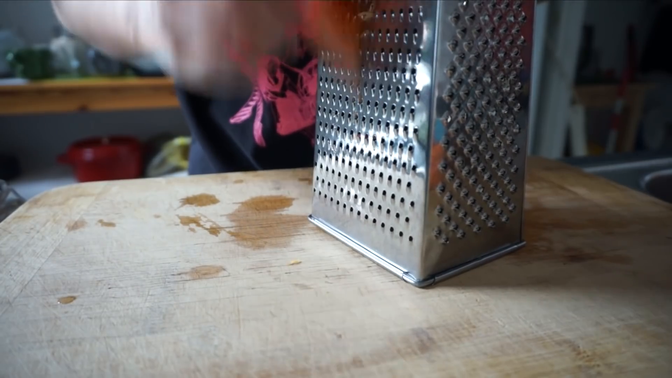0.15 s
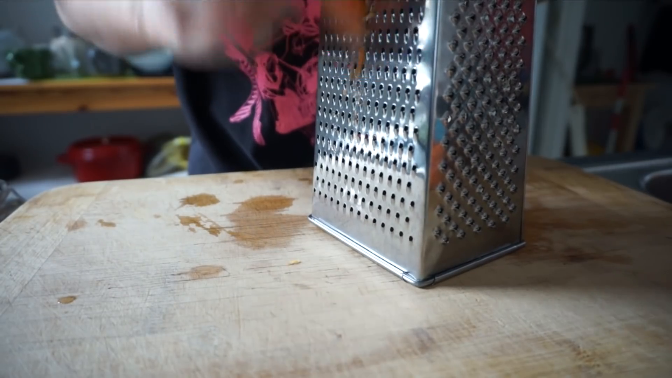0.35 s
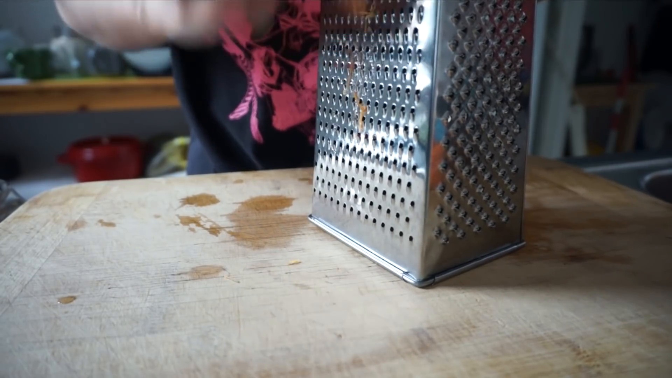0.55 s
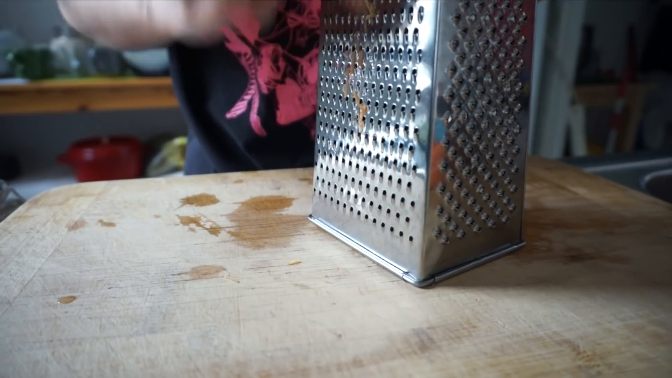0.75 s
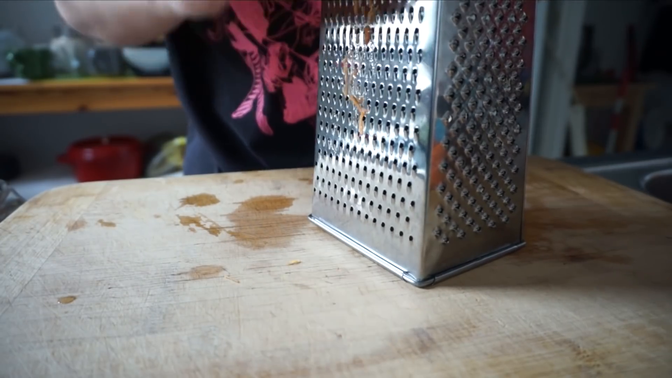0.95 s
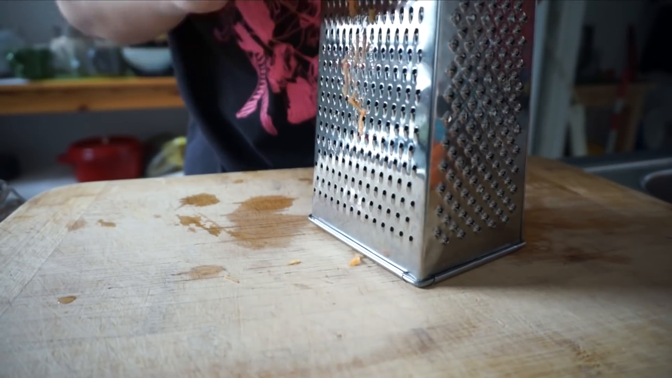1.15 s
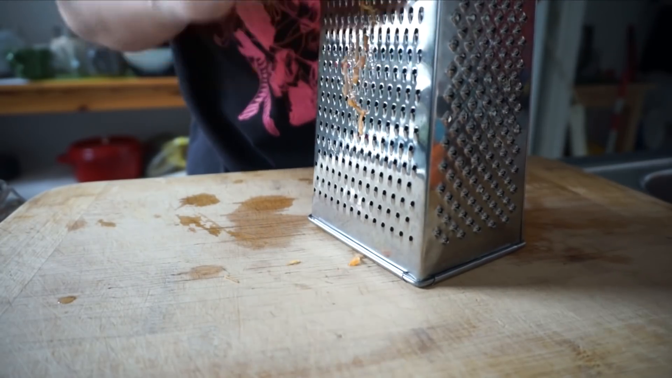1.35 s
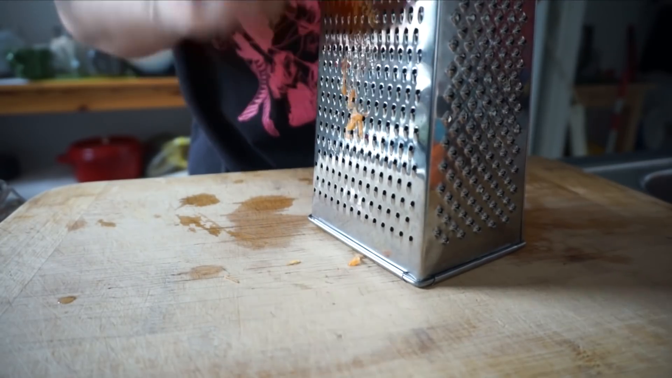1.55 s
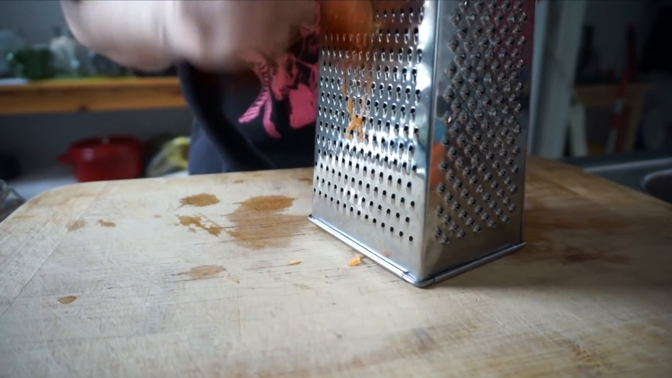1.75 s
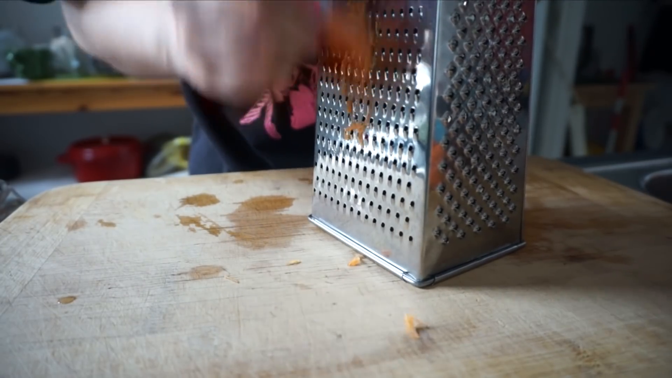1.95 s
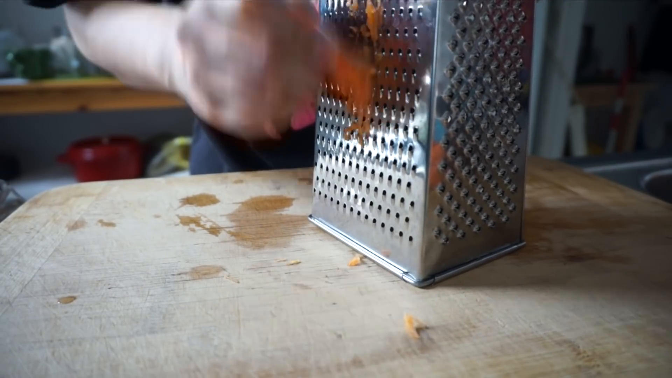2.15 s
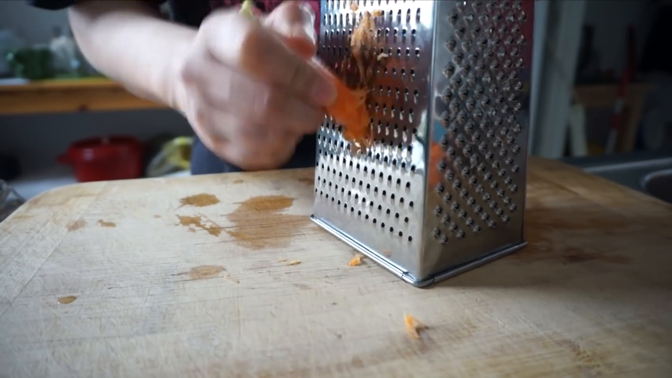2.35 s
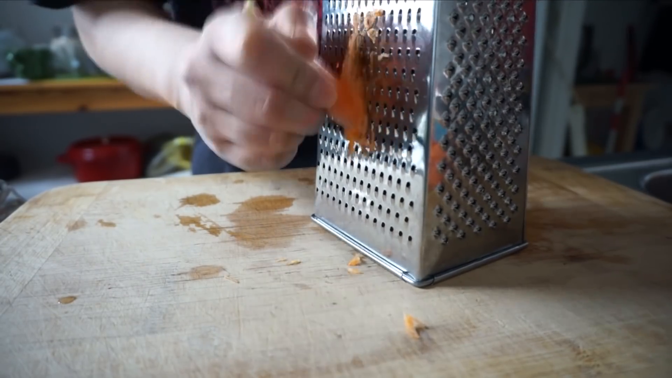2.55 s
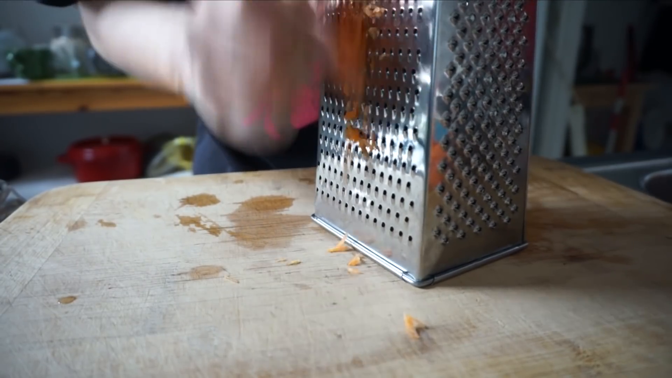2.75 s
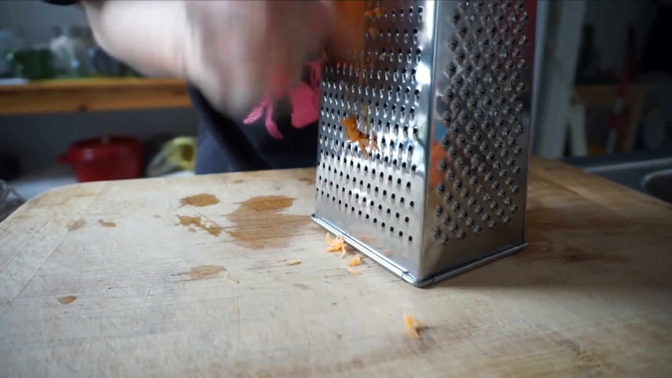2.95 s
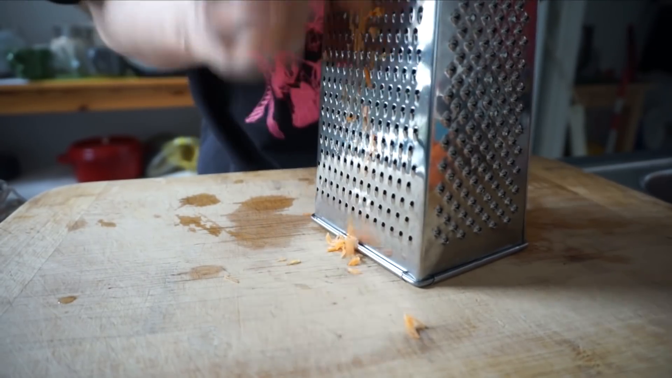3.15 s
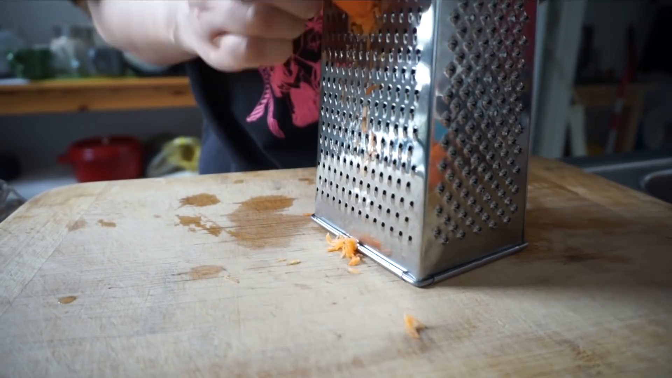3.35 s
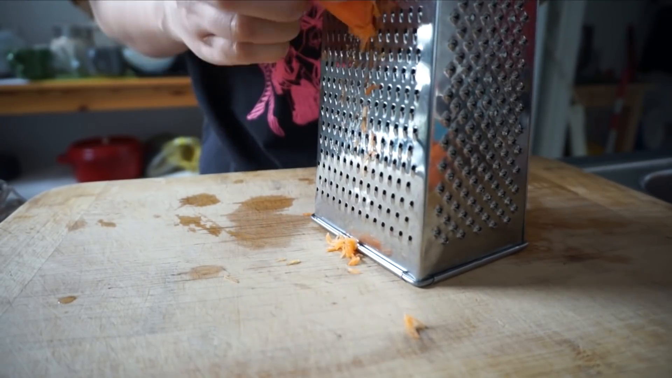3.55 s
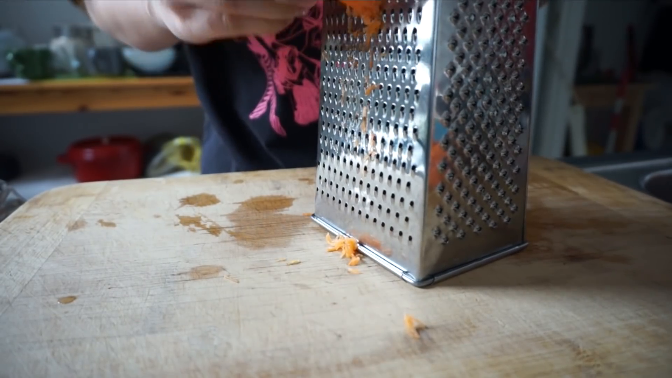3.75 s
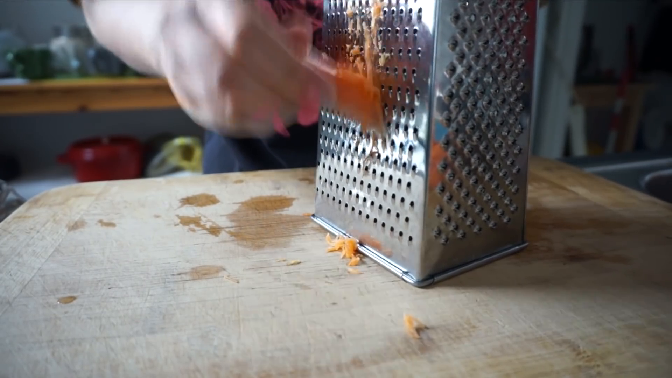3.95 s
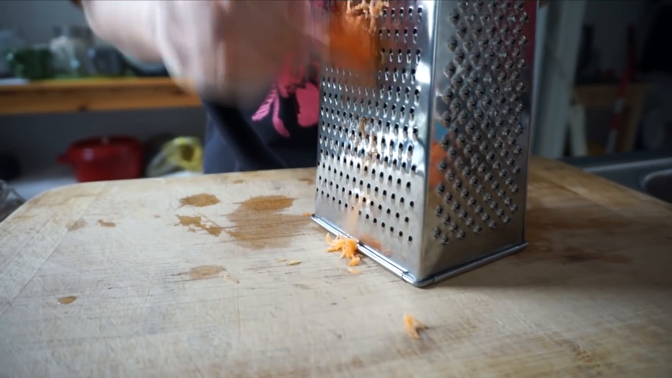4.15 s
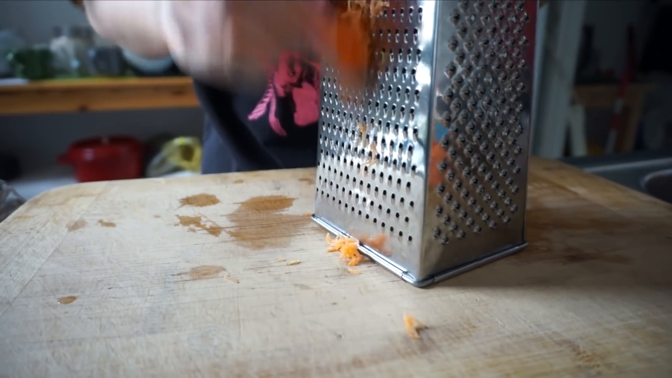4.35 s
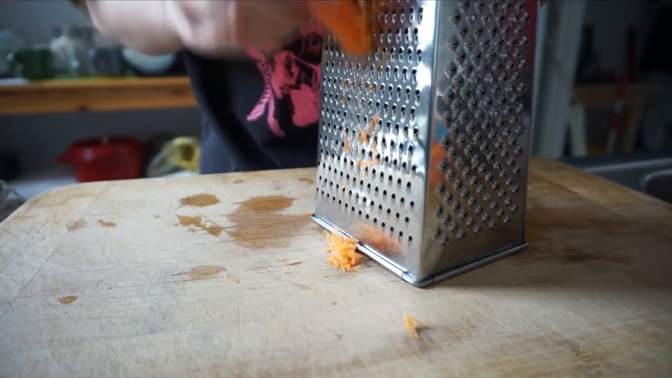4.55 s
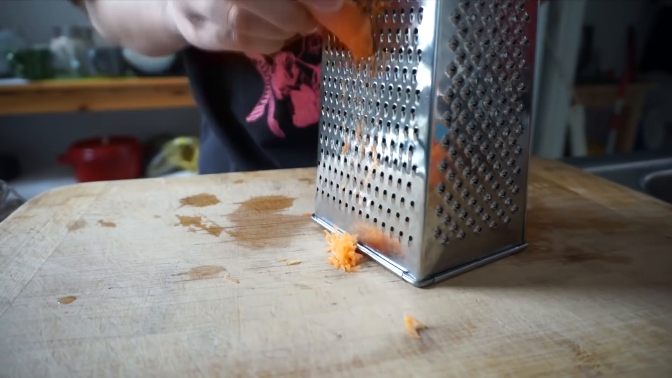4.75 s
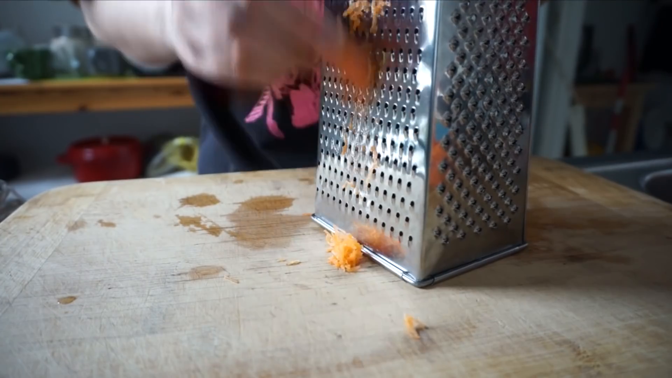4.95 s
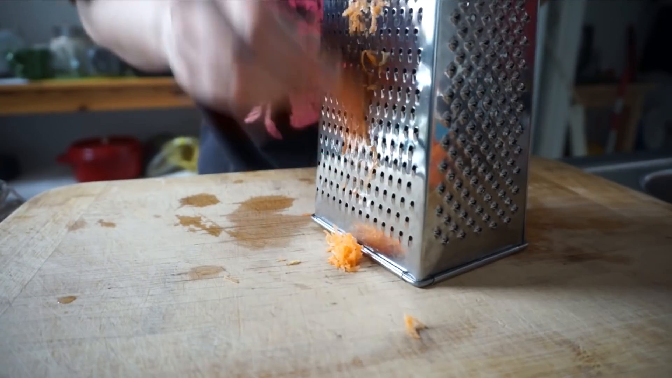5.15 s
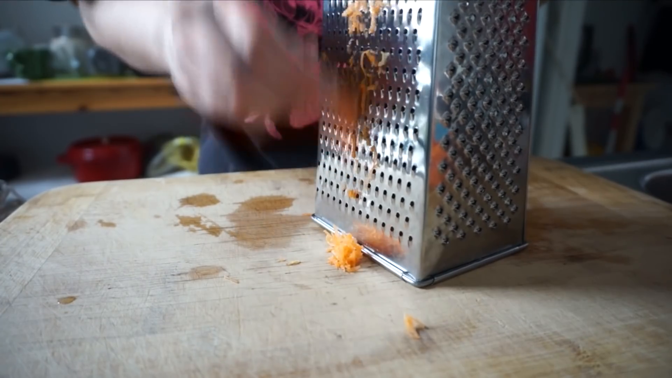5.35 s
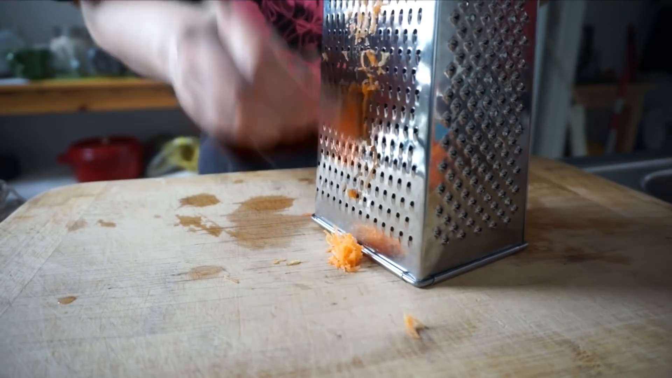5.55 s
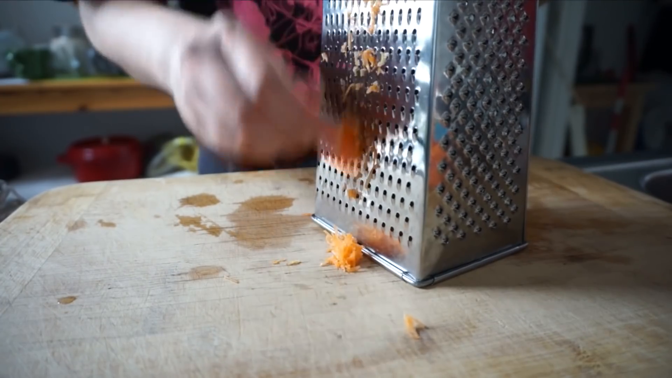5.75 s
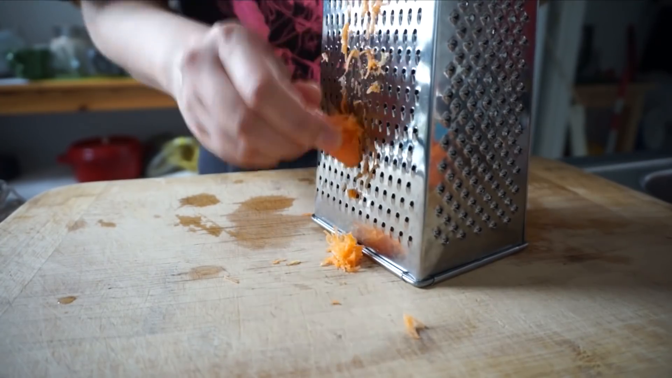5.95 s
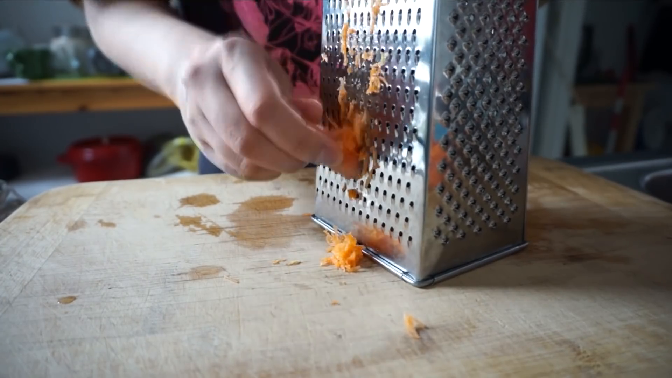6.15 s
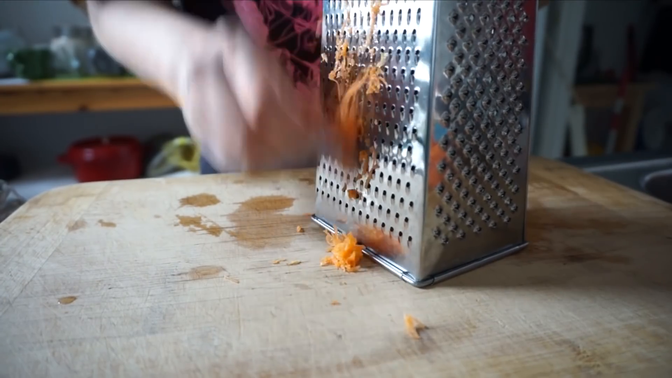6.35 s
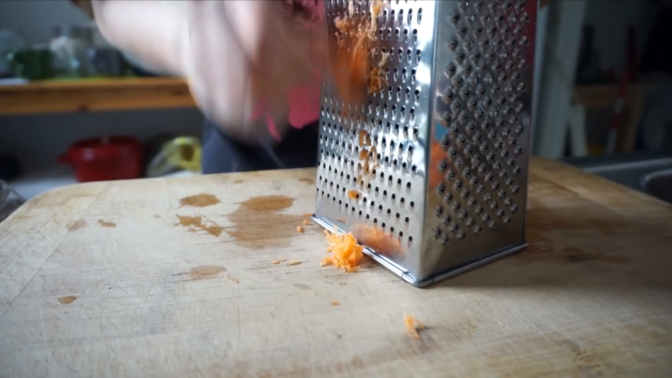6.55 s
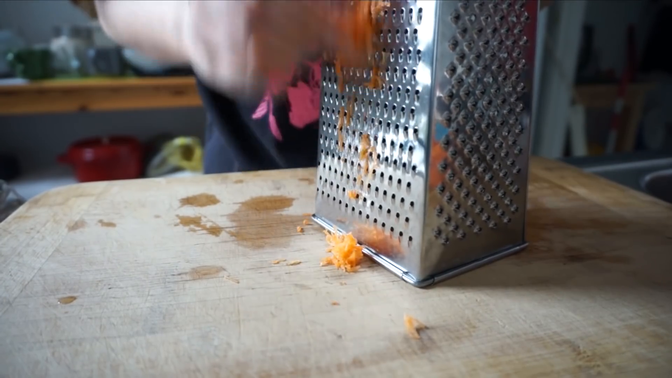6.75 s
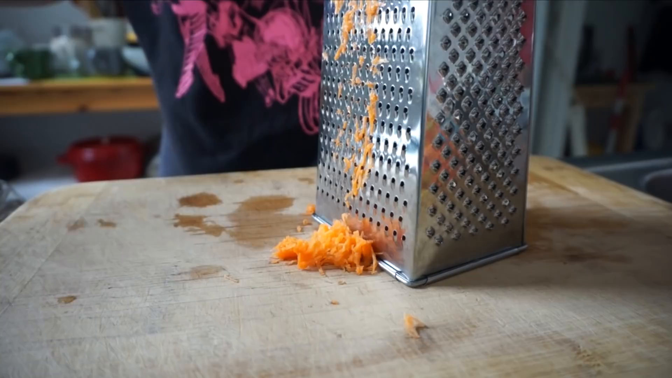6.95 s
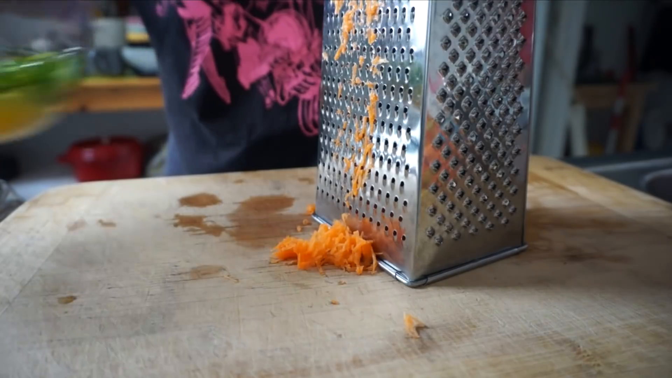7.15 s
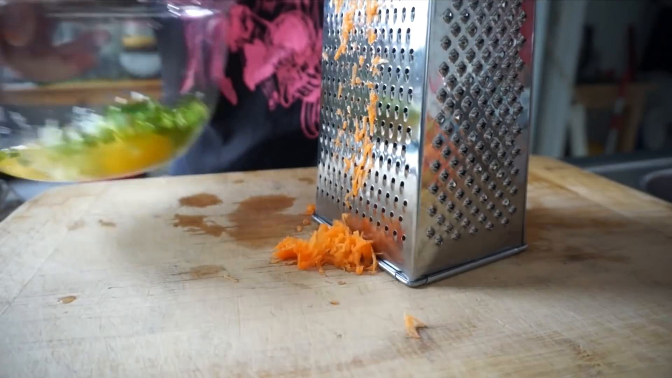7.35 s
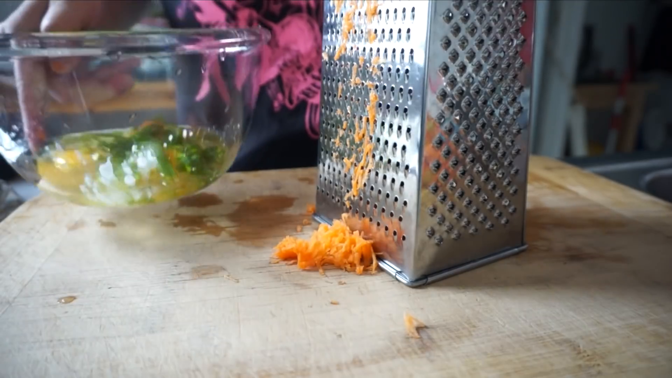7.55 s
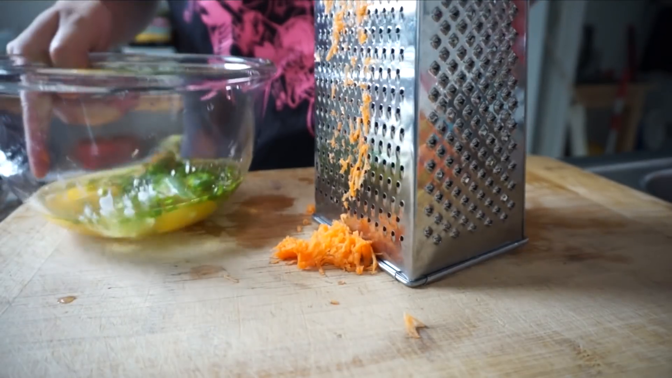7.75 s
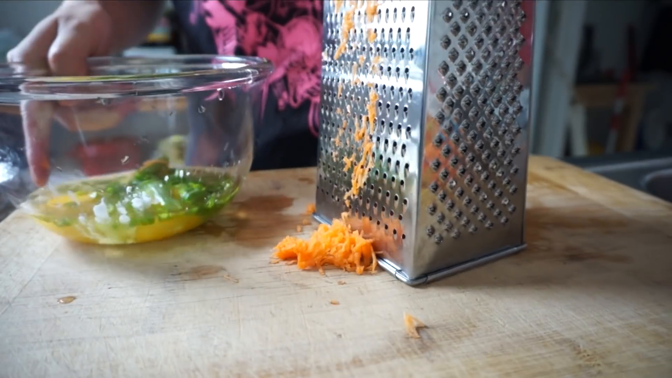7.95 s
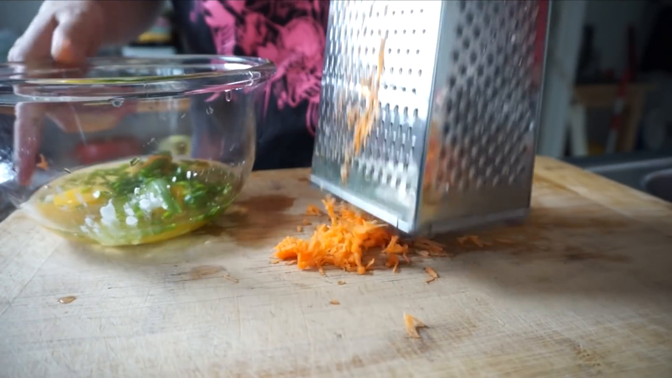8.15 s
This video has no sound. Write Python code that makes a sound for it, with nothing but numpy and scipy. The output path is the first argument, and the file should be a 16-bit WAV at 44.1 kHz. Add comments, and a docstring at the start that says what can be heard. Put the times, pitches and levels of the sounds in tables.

```python
"""A carrot is rubbed quickly up and down a steel box grater standing on a wooden board in a kitchen.
Dense random clicks, louder as the hand moves faster, make the tearing rasp and ring sheet-metal walls and box.
After a jump in time come faint hollow ticks, then a glass bowl is set down and rocks to rest: each touch
rings glass and board and throws a noisy clatter. Shaped noise gives the room's hum and hiss throughout.
A small close stereo microphone with a limiter picks it all up."""
import sys
import numpy as np
from scipy import signal
from scipy.fft import rfft, irfft, next_fast_len
from scipy.io import wavfile
from scipy.ndimage import uniform_filter1d

SR = 44100
rng = np.random.default_rng(int(sys.argv[2]) if len(sys.argv) > 2 else 0)


def ratio_of_db(decibels):
    """Turn decibels (scalar or array-like) into linear amplitude factors; 0 dB maps to 1."""
    return 10 ** (np.asarray(decibels, float) / 20)


def to_wav(s):
    """Save 16-bit WAV."""
    ch = np.atleast_2d(s).T  # columns
    pcm = np.round(np.clip(ch, -1, 1) * 32767)  # PCM
    wavfile.write(sys.argv[1], SR, pcm.astype(np.int16))


N = 362080   # length in samples


def rms_one(x):
    """Scale to unit rms."""
    return x / np.sqrt(np.mean(x ** 2) + 1e-20)


def shaped(x, points):
    """Filter by a smooth spectrum, joined on a log frequency axis through (pitch_hz, level_db) points."""
    size = next_fast_len(N)
    hz, db = np.transpose(points)
    bin_hz = np.arange(size // 2 + 1) * SR / size
    gain = ratio_of_db(np.interp(np.log(bin_hz + 1), np.log(hz), db))
    return irfft(rfft(x, size) * gain, size)[..., :N]


def coloured(x, points):
    """Filter by a smooth spectrum, then scale to unit rms."""
    return rms_one(shaped(x, points))


def drift(rate_hz):
    """Slow chance: noise through two equal one-pole low-passes with corners at rate_hz; spread 1."""
    hop = 40   # samples between drawn values
    r = np.exp(-2 * np.pi * rate_hz * hop / SR)
    noise = rng.standard_normal(N // hop + 2002)
    slow = signal.lfilter([1], [1, -2 * r, r * r], noise)[2000:]   # skip the filter's settling
    return np.interp(np.arange(N) / hop, np.arange(len(slow)), rms_one(slow))


def ring(push, hz, t60_s):
    """A decaying resonance: a unit click sets a sine of height 1 ringing."""
    r, w = ratio_of_db(-60 / (t60_s * SR)), 2 * np.pi * hz / SR
    return signal.lfilter([0, np.sin(w)], [1, -2 * r * np.cos(w), r * r], push + 1e-18)


def resonate(force, modes, wander_db, wander_hz):
    """The contact point moves, so each mode is driven now strongly, now weakly; the sharpest ring steadiest."""
    out = 0
    for hz, width_hz, db in modes:
        wander = np.minimum(drift(wander_hz) + 0.62 * drift(1.5), 1.5)
        drive = force * ratio_of_db(wander_db * min(width_hz / 50, 1) * wander)
        r = np.exp(-np.pi * width_hz / SR)
        feedback = [1, -2 * r * np.cos(2 * np.pi * hz / SR), r * r]
        mode = signal.lfilter([(1 - r * r) / 2, 0, (r * r - 1) / 2], feedback, drive)
        out = out + ratio_of_db(db) * mode
    return out


def hand():
    """Relative rasp and boom levels in dB: the hand swings like a pendulum; a light brush fills the turns."""
    # strokes, firm down and light up in turn, each until the next turn of the hand:
    # start_s [s], midway_rasp_db [dB], swell_db from start to end [dB], boom_db against the rasp [dB]
    strokes = [(-0.03, -8.5, -1, -15), (0.073, -10, -5, -20.4), (0.178, -6.5, -1, -17.5),
               (0.278, -12, -1, -21), (0.382, -9.5, -4.5, -17.5), (0.501, -12.0, 12, -22),
               (0.599, -9, 0, -14), (0.703, -11, 5.5, -24), (0.809, -7, 2, -16.8), (0.917, -12.5, 1, -17.1),
               (1.026, -7, -3, -17), (1.135, -10.5, 3, -22), (1.236, -8, -3, -18.5),
               (1.348, -10.5, 11, -20), (1.451, -7.5, -2.5, -15.0), (1.561, -10, -6, -21),
               (1.672, -9, -7, -16.5), (1.785, -11.5, 9, -20), (1.886, -8, 0, -16.5),
               (1.996, -10.5, 10, -18), (2.105, -4.5, -6, -17.5), (2.22, -11, 0, -18), (2.323, -9, 0, -15),
               (2.435, -10.5, -1, -19), (2.54, -7.5, -7, -15.5), (2.655, -12, 10, -20),
               (2.764, -8.0, 2.5, -13.3), (2.883, -8.5, -7.0, -17.5), (2.987, -8, 2, -17.5),
               (3.096, -13.0, 9.5, -16.5), (3.209, -8.2, -3, -17.5), (3.317, -16, -12, -20),
               (3.929, -9, 13, -15.5), (4.071, -14, 5, -12.5), (4.188, -9.5, 3, -13.5),
               (4.292, -12.5, 7, -12.5), (4.404, -7.5, 2, -13), (4.51, -9.2, 0, -15.2),
               (4.617, -7.5, -2, -17), (4.733, -11, -2, -14.5), (4.847, -5, -3, -13.5),
               (4.958, -12, -5, -16), (5.068, -7.8, 3, -13), (5.176, -12, -8, -16.3),
               (5.287, -9, -1, -14.5), (5.391, -10.5, -4.5, -15.5), (5.501, -7, -2.5, -16.5),
               (5.608, -11, 0, -18), (5.718, -9, -2, -15), (5.823, -11, -6, -19.5), (5.934, -8, 3, -15.6),
               (6.039, -10.5, -2, -15), (6.143, -7, 3, -14.8), (6.257, -9.5, -10, -15),
               (6.362, -8.1, 2.5, -17.5), (6.472, -11, 1.0, -18.5), (6.586, -9.5, 0, -17.5),
               (6.698, -12, 1.5, -19), (6.802, -9, -2, -14.5), (6.917, -12, -4, -21.5)]
    # the lifted carrot grazes the teeth: start_s [s], length_s [s], rasp_db [dB]
    grazes = [(3.442, .051, -23), (3.512, 0.033, -44), (3.65, 0.022, -41.5), (3.759, .015, -39),
              (3.889, 0.014, -29)]
    # a row of teeth snags at once and lets go fast: start_s [s], rasp_db [dB]
    catches = [(0.395, -13), (0.617, -8.5), (0.7148, -8.5), (1.1545, -7), (1.4067, -8), (1.641, -6),
               (1.9025, -4.5), (2.3347, -13), (2.898, -2.5), (3.4451, -21), (4.208, -5), (4.5326, -9),
               (5.086, -6), (5.625, -5), (5.73, -10), (5.947, -9), (6.6029, -7)]
    longest_stroke_s = 0.12
    # pairs are (down, up)
    early_peak = (0.86, 0.93)     # exponent; under 1 the hand reaches full speed before half way
    speed_power = (1.66, 1.29)    # the rasp follows hand speed to this power
    full_bite_db = (4, 2.5)       # the rasp stops growing this far under its uncapped peak
    brush_db = (-24, -21)         # carrot resting on the teeth at the turn before the stroke
    lift_s, resume_s, lift_db_per_s = 3.33, 3.95, 300   # it is lifted off in the pause
    graze_rise_db_per_s, graze_fall_db_per_s, catch_fade_db_per_s = 1500, 700, 500

    t = np.arange(N) / SR
    turn, midway, swell, boom = np.transpose(strokes)
    length = np.minimum(np.diff(turn, append=N / SR), longest_stroke_s)
    k = np.maximum(np.searchsorted(turn, t, side="right") - 1, 0)
    up = k % 2
    along = np.clip((t - turn[k]) / length[k], 0, 1)   # 0 to 1 through the stroke

    speed = np.abs(np.sin(np.pi * along ** np.take(early_peak, up)))
    speed_db = 20 * np.log10(speed + 1e-6)
    bite_db = np.minimum(np.take(speed_power, up) * speed_db + np.take(full_bite_db, up), 0)
    stroke_db = midway[k] + swell[k] * (along - 0.5) + bite_db

    resting_db = np.interp(t, turn, np.resize(brush_db, len(turn)))
    resting_db = resting_db - lift_db_per_s * np.maximum(t - lift_s, 0) * (t < resume_s)
    rasp_db = 10 * np.log10(ratio_of_db(2 * stroke_db) + ratio_of_db(2 * resting_db))   # powers add

    for start_s, length_s, db in grazes:
        rise_db = graze_rise_db_per_s * np.maximum(start_s - t, 0)
        fall_db = graze_fall_db_per_s * np.maximum(t - start_s - length_s, 0)
        rasp_db = np.maximum(rasp_db, db - rise_db - fall_db)
    for start_s, db in catches:
        span = slice(int(start_s * SR), int((start_s + 0.03) * SR))
        catch_db = db - catch_fade_db_per_s * (t[span] - start_s)
        rasp_db[span] = np.maximum(rasp_db[span], catch_db)
    rasp_db = np.maximum(rasp_db, -90)

    # a light touch hardly moves the box
    boom_db = rasp_db + boom[k] + 0.3 * np.minimum(rasp_db + 25, 0)
    return rasp_db, boom_db


def grating():
    """Teeth bite in dense, randomly timed clicks that ring the steel; light strokes catch and skip more."""
    # spectrum of the tearing flesh: pitch_hz [Hz], level_db [relative dB per Hz]
    rasp_spectrum = [(470, -34.5), (800, -12.5), (884, -13), (1140, -5), (1460, -11.5), (2230, -4.5),
                     (2970, -5.5), (4060, -6.5), (11600, -10.5), (15900, -14.5)]
    # resonances of the grater walls: pitch_hz [Hz], width_hz [Hz], level_db [relative dB]
    wall_modes = [(990, 80, -13.5), (1148.5, 11.4, 4), (1277, 40, -4.5), (1679, 74, -8), (1874, 18, -8),
                  (2183, 28.6, -2), (2322, 50, -9.5), (2668, 58, -2), (3270, 35, -14), (3460, 82, -7),
                  (3920, 78, -5.5), (4224, 63, -5.5), (4540, 59, -12), (5130, 46, -7), (5535, 53, -5.5),
                  (7280, 47, -15.5), (8280, 170, -20)]
    # hollow box and the board under it: pitch_hz [Hz], width_hz [Hz], level_db [relative dB]
    box_modes = [(326, 20, -3.5), (386, 20, -6), (518.6, 34.4, 4), (588, 54, -2.5), (687, 65, 3),
                 (765, 66, -1.5)]
    bites_per_s = 9000

    rasp_db, boom_db = hand()
    bites = rms_one(rng.choice([-1, 1], N) * (rng.random(N) < bites_per_s / SR))
    skip_depth_db = np.clip(0.92 * (-10.5 - rasp_db), 0, 2.2)
    skip_db = skip_depth_db * drift(43) + 0.48 * drift(300)
    rasp_gain = ratio_of_db(rasp_db + skip_db)
    boom_gain = ratio_of_db(boom_db + skip_db)

    rasp = coloured(bites, rasp_spectrum)
    dull = signal.lfilter(*signal.butter(1, 5000, fs=SR), rasp)
    # faster rubbing makes sharper bites: the treble swings wider than the rest
    sharp_db = 0.47 * np.clip(rasp_db + 3.5, -16, 6) + 1.9 * drift(6.5)
    tearing = ratio_of_db(-5) * (dull + (rasp - dull) * ratio_of_db(sharp_db)) * rasp_gain

    walls = ratio_of_db(6.5) * resonate(bites * rasp_gain, wall_modes, wander_db=4, wander_hz=20)
    box = ratio_of_db(11.5) * resonate(bites * boom_gain, box_modes, wander_db=4, wander_hz=16)
    bass_cut = signal.butter(3, 230, "high", fs=SR, output="sos")   # the box is too small to radiate bass
    return signal.sosfilt(bass_cut, tearing + walls + box)


def bowl():
    """Each touch of the rocking bowl rings glass and board and throws a short noisy clatter."""
    # bowl touching and rocking on the board: start_s [s], glass_db [relative dB], board_db [relative dB]
    hits = [(7.734, -37, -33), (7.8403, 1.5, -29), (7.845, -8.5, -9), (7.872, -6.5, -21),
            (7.893, -12.5, -20), (7.92, -21, -34), (7.94, -27, -12.5), (7.951, -10.5, -19),
            (7.962, -19.5, -30), (7.991, -26, -42), (8.008, -30, -39), (8.029, -32, -41), (8.044, -30, -20),
            (8.09, -27, -43)]
    # glass, damped by the hand and its load: pitch_hz [Hz], level_db [relative dB], t60_s [s]
    glass_modes = [(706, -11.5, .06), (946, 1, 0.059), (1041, -4, 0.061), (1120, -12, 0.073),
                   (1280, -11.5, 0.042), (1690, -12.5, 0.038), (2020, -11, .03), (2580, -27, .03)]
    # wooden board: pitch_hz [Hz], level_db [relative dB], t60_s [s]
    board_modes = [(314, -10, 0.048), (498, -3, 0.037), (596, -3.5, 0.023)]
    # clatter spectrum: pitch_hz [Hz], level_db [relative dB per Hz]
    clatter_spectrum = [(150, -13), (400, -4.5), (1000, -0.5), (1800, 0), (2800, -12), (4200, -34),
                        (9000, -50), (16000, -56)]
    clatter_t60_s = 0.08

    glass, board, burst = np.zeros((3, N))
    for start_s, glass_db, board_db in hits:
        at = round(start_s * SR)
        glass[at] = ratio_of_db(glass_db)
        board[at] = ratio_of_db(board_db)
        burst[at:] += ratio_of_db(glass_db - 60 * np.arange(N - at) / SR / clatter_t60_s)
    burst = uniform_filter1d(burst, size=60)   # the clatter swells over about a millisecond

    rings, thuds = 0, 0
    for k, (hz, db, t60_s) in enumerate(glass_modes):   # neighbouring modes alternate in sign
        rings = rings + ratio_of_db(db - 3) * (-1) ** k * ring(glass, hz, t60_s)
    for k, (hz, db, t60_s) in enumerate(board_modes):
        thuds = thuds + ratio_of_db(db) * (-1) ** k * ring(board, hz, t60_s)
    soft_contact = signal.butter(3, 3000, fs=SR)   # the foot of the bowl lands softly
    knocks = signal.lfilter(*soft_contact, rings + thuds)

    clatter = ratio_of_db(-12.5) * burst * coloured(rng.standard_normal(N), clatter_spectrum)
    bass_cut = signal.butter(2, 260, "high", fs=SR, output="sos")   # board and bowl radiate little bass
    return signal.sosfilt(bass_cut, knocks + clatter)


def ticks():
    """Faint clicks ring a few decaying modes, mostly near one kilohertz, while the bowl is carried in."""
    # faint hollow ticks: start_s [s], level_db [relative dB]
    tick_times = [(7.0825, -42), (7.1268, -31), (7.148, -46), (7.212, -35), (7.273, -48), (7.3096, -44),
                  (7.416, -31), (7.7828, -33)]
    # their resonances: pitch_hz [Hz], level_db [relative dB], t60_s [s]
    tick_modes = [(1153, -3.5, .15), (1205, 0, 0.14), (1280, -10, .1), (2330, -8, .08)]
    clicks = np.zeros(N)
    for start_s, db in tick_times:
        clicks[round(start_s * SR)] = ratio_of_db(db)
    return sum(ratio_of_db(db - 8) * ring(clicks, hz, t60_s) for hz, db, t60_s in tick_modes)


def kitchen(x):
    """Dense room echoes as decaying noise, different at each ear; the treble dies first."""
    t60_s, bright_t60_s, split_hz = 0.42, 0.15, 1900
    t = np.arange(SR // 2) / SR
    noise = rng.standard_normal((2, len(t))) * (t > 0.004)   # a gap before the first echoes
    dull = signal.lfilter(*signal.butter(1, split_hz, fs=SR), noise)
    bright = noise - dull
    echoes = dull * ratio_of_db(-60 * t / t60_s) + bright * ratio_of_db(-60 * t / bright_t60_s - 9)
    echoes /= np.sqrt(np.sum(echoes ** 2) / 2)
    return signal.fftconvolve(x[:, None], echoes[None], axes=2)[..., :N]


def room_air(before_jump):
    """Room hum and microphone hiss: wide shaped noise with a gently fluttering level, other after the jump."""
    # spectra before and after the jump: pitch_hz [Hz], level_db [relative dB per Hz]
    early_spectrum = [(30, -22), (80, -35), (104, -2.5), (130, -5), (165, -8.5), (195, 1.5), (250, -9),
                      (330, 1.5), (480, -17), (900, -24), (1150, -8), (1500, -23), (2000, -9.5),
                      (2800, -26), (16000, -33)]
    later_spectrum = [(40, -42), (80, -28), (120, -12.5), (200, -1.5), (320, -11), (550, -19), (900, -14.5),
                      (1190, -1.5), (1500, -15), (2300, -9.5), (2800, -16.5), (16000, -25)]
    noise = rng.standard_normal((2, N))
    noise = noise[0] + 0.72 * noise[1] * [[1], [-1]]   # shared part plus opposed part
    early = ratio_of_db(-44) * coloured(noise, early_spectrum)
    later = ratio_of_db(-45.5) * coloured(noise, later_spectrum)
    return np.where(before_jump, early, later) * ratio_of_db(0.9 * drift(18))


def scene():
    """Grating, cut off at the jump in time, then ticks and bowl, over the air of the room."""
    jump_s = 7.034
    before_jump = np.arange(N) < jump_s * SR
    rub = grating()
    knock = bowl() + ticks()
    rub_room, knock_room = kitchen(np.array([rub, knock]))
    near = (rub + ratio_of_db(-14) * rub_room) * before_jump
    near = near + knock + ratio_of_db(-7) * knock_room
    slightly_right = ratio_of_db([[-0.8], [0.8]])   # left and right gain
    return near * slightly_right + room_air(before_jump)


def low_pass(x):
    """Removes everything above the highest recorded frequency."""
    return signal.sosfilt(signal.butter(12, 16020, fs=SR, output="sos"), x)


def record(dry):
    """Close microphone ports narrow the image; a limiter lets onsets through, then ducks and recovers slowly."""
    # gain of the side signal: pitch_hz [Hz], level_db [dB]
    side_gain = [(60, -34), (200, -15.5), (700, -8.5), (1200, -6.5), (2400, -9.5), (5000, -12.5),
                 (16000, -20.5)]
    limit_db, release_db_per_s, attack_s = -9, 87, 0.0018
    low_cut_hz, top_cut_hz = 57, 16180

    mid = dry.mean(axis=0)
    side = shaped((dry[0] - dry[1]) / 2, side_gain)
    level_db = 10 * np.log10(uniform_filter1d(mid ** 2, size=88) + 1e-12)   # over two milliseconds
    # hold each peak, falling at the release rate
    slope = release_db_per_s * np.arange(N) / SR
    held_db = np.maximum.accumulate(level_db + slope) - slope
    over_db = np.maximum(held_db - limit_db, 0)
    r = np.exp(-1 / (attack_s * SR))
    gain = ratio_of_db(-signal.lfilter([1 - r], [1, -r], over_db))

    stereo = gain * np.array([mid + side, mid - side])
    out = 1.307 * np.tanh(stereo / 1.31)   # soft ceiling
    out = signal.sosfilt(signal.butter(2, low_cut_hz, "high", fs=SR, output="sos"), out)
    out = signal.sosfilt(signal.cheby2(12, 60, top_cut_hz, fs=SR, output="sos"), out)
    return low_pass(out)


dry = scene()
out = record(dry)
to_wav(out)
```